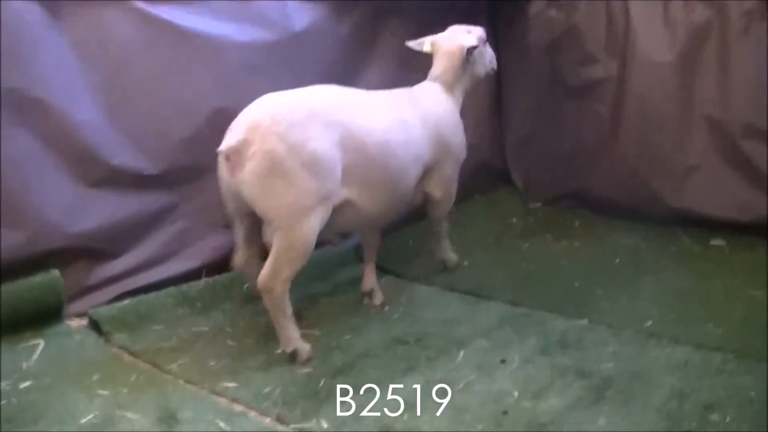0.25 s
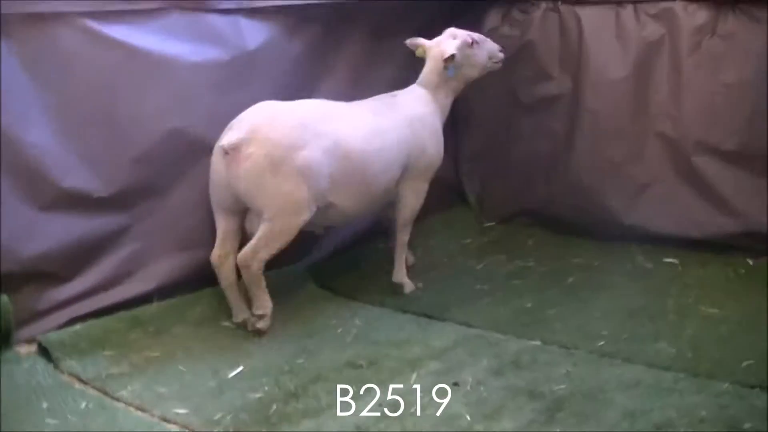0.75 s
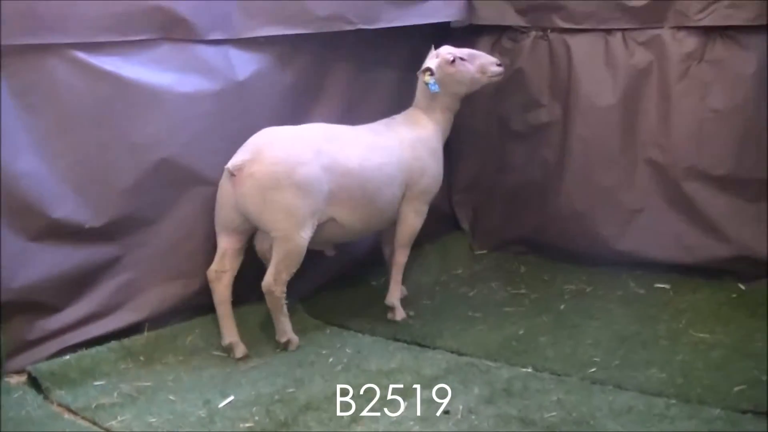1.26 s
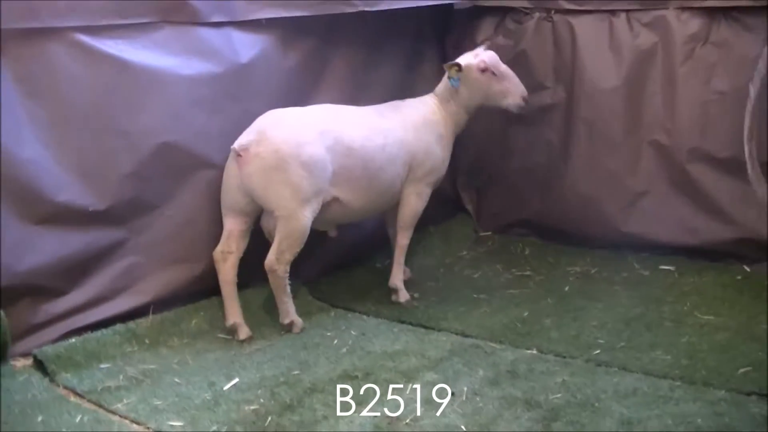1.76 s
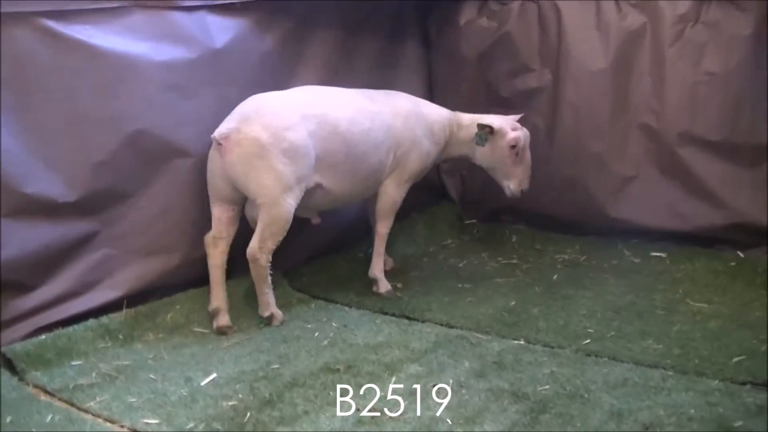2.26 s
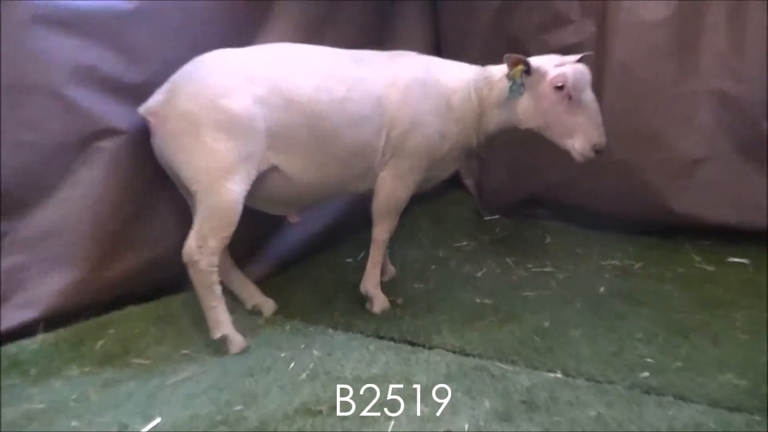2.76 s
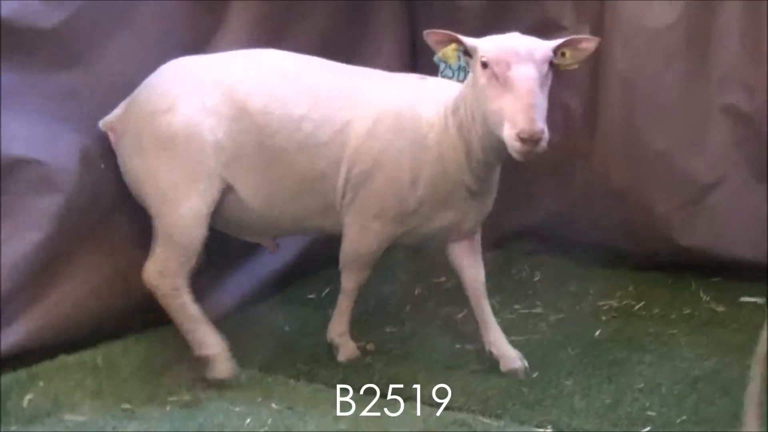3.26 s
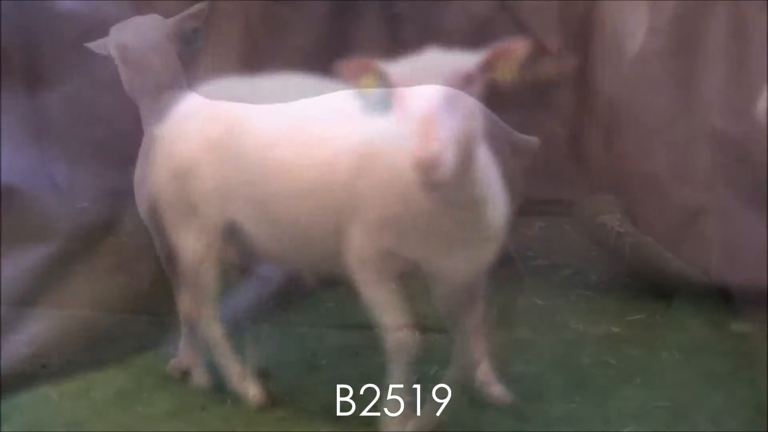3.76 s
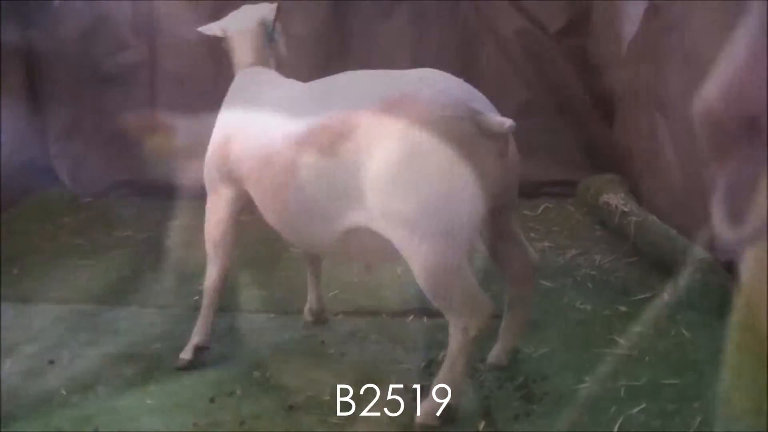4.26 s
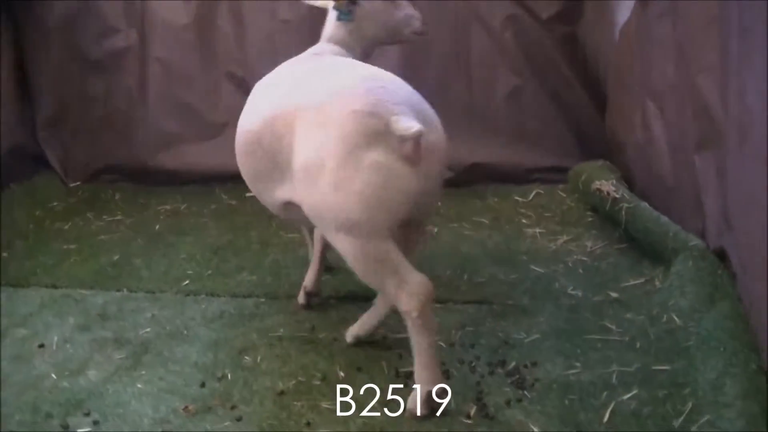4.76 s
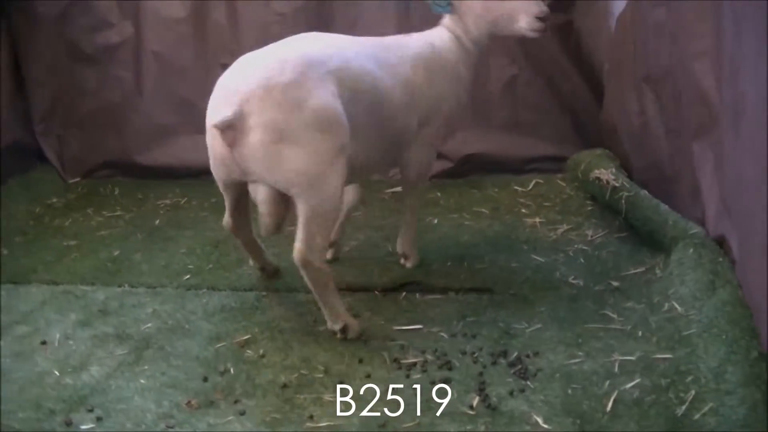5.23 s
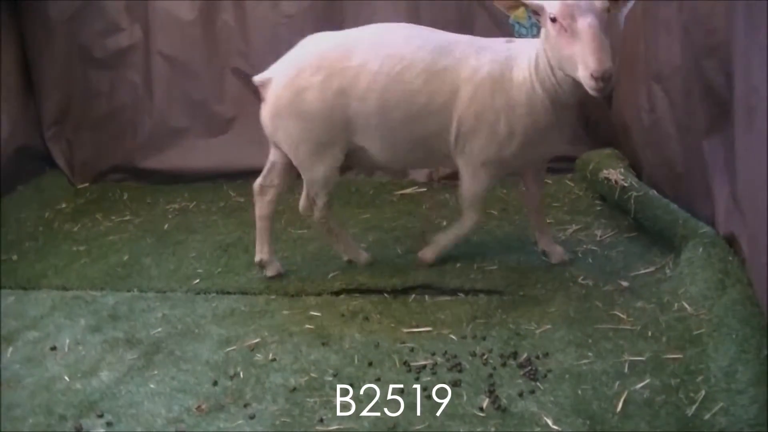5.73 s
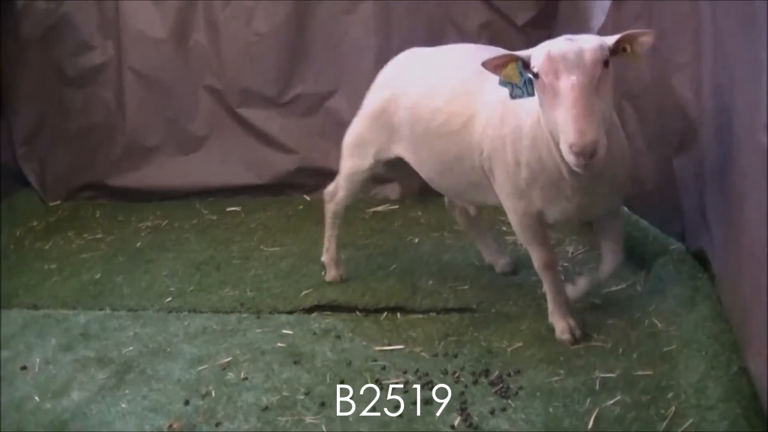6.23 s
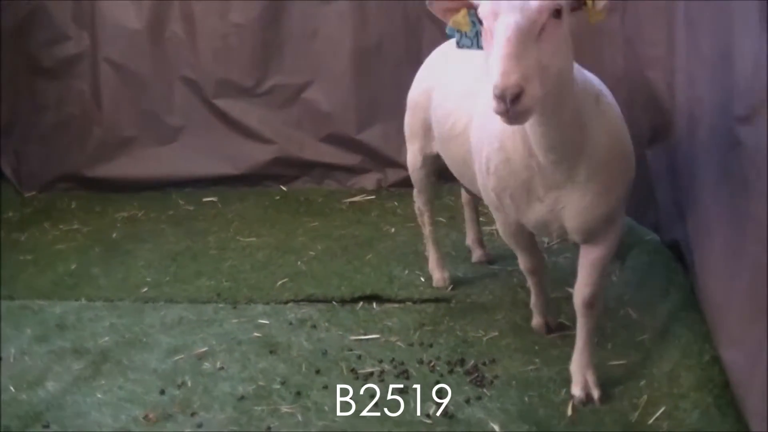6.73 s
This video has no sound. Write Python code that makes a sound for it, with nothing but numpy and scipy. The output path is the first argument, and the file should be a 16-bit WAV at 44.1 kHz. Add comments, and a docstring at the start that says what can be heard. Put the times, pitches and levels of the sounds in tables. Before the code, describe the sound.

A deep sheep bleat rises from a hum to a loud, strained call close to the microphone, and a younger sheep replies on the right with a shorter, higher one. Small birds sing all the while in the lightly echoing barn, their thin whistles and falling sweeps turning into sharp chirps and twittering in the second half. Hooves thud softly on matting now and then, above a quiet, steady hiss and rumble.

```python
"""Two sheep in a barn

A ram starts a low bleat with closed lips and opens his mouth as it swells; a younger sheep answers
with a high bleat from the right. Each voice is a train of glottal pulses filtered by the throat.
Small birds sing gliding, nearly pure tones under the roof, and the ram's hooves thud softly on the
matting. Faint hoarse calls reverberate far away, over a steady hiss and a low rumble of air."""
import sys
import numpy as np
from scipy import signal
from scipy.fft import rfft, irfft
from scipy.io import wavfile
from scipy.ndimage import uniform_filter1d

SR = 44100
rng = np.random.default_rng(int(sys.argv[2]) if len(sys.argv) > 2 else 0)


def file_out(sig):
    """Save sig as 16-bit WAV at sys.argv[1]."""
    # one column per channel
    cols = np.atleast_2d(sig).T
    # limit, then scale
    lim = np.clip(cols, -1, 1)
    pcm = np.round(lim * 32767).astype(np.int16)
    wavfile.write(sys.argv[1], SR, pcm)


N = 308241
TIME = np.arange(N) / SR
CUTOFF_HZ = 10450

# Reverberation of the barn. Each row: frequency in Hz, time to decay by 60 dB in seconds.
BARN_T60 = [(500, 0.29), (3000, 0.49), (6000, 1), (10000, 0.66)]
# Rumble of air. Each row: time in seconds, level in dB.
RUMBLE_LEVEL = [(0, -50.5), (.6, -50), (4.2, -54), (5.2, -44.5), (6.99, -51.5)]
# Spectra of the rumble (shared by the steps), the hiss and the distant calls.
# Each row: frequency in Hz, relative level in dB.
RUMBLE_SPECTRUM = [(12, -6.5), (35, 2.5), (90, -7.5), (170, -16.5), (400, -32), (2000, -77.5)]
HISS_SPECTRUM = [(200, 0.5), (400, 2), (900, -7), (2000, -6.5), (6000, 0.5), (10400, -7)]
FAR_CALL_SPECTRUM = [(800, -54), (1150, -3.5), (1400, 2.5), (2100, -10.5), (3000, -40.5)]
RUMBLE_CORRELATION = 0.083  # between left and right
# Distant hoarse calls. Each row: start in seconds, length in seconds, top pitch in Hz, level in dB.
FAR_CALL_NOTES = [(4.77, .43, 238.4, -54.5), (5.58, .33, 244.2, -56.5)]
# Hooves on the matting. Each row: start in seconds, peak level in dB.
HOOF_FALLS = [(0.751, -41.5), (4.541, -39.5), (5.095, -38.5), (5.42, -37.5), (6.584, -43.5)]

# Whistles from the far end of the hall.
# Each row: start in seconds, length in seconds, lowest pitch in Hz, top pitch in Hz, level in dB.
FAR_WHISTLE_NOTES = [(0.154, 0.093, 2046, 3460, -43), (0.609, 0.076, 2180, 3485, -41.5),
                     (6.566, 0.15, 2473, 3573, -41), (6.882, 0.089, 2227, 3190, -36.5)]
# Low rounded bird notes. Each row: start in seconds, level in dB.
HOOT_NOTES = [(.03, -45.5), (.488, -45.5)]
# Whistles of the near birds.
# Each row: start in seconds, length in seconds, first pitch in Hz, last pitch in Hz, level in dB.
WHISTLE_NOTES = [(0.206, 0.12, 5900, 5990, -51), (1.029, 0.069, 2995, 2720, -51.5),
                 (1.108, 0.11, 6106, 6290, -46), (1.208, 0.077, 6240, 5320, -48.5),
                 (1.243, 0.052, 4650, 4430, -48.5), (1.323, .019, 5210, 3784, -42.5),
                 (1.397, 0.06, 3430, 2540, -47.5), (1.454, 0.18, 7386, 7320, -47),
                 (1.522, 0.11, 3240, 2750, -50.5), (1.721, 0.032, 3340, 3200, -43.5),
                 (1.725, 0.07, 5114, 4790, -45.5), (1.8, 0.025, 4660, 3420, -47.5),
                 (1.914, .079, 5150, 4906, -44), (2.11, 0.06, 4998, 4940, -41.5),
                 (2.265, 0.09, 7860, 7760, -46), (4.063, .15, 7940, 7450, -51.5),
                 (4.823, .21, 3073, 3210, -50), (5.163, .13, 3210, 2916, -53.5),
                 (5.3, 0.16, 2610, 2286, -57.5), (5.738, 0.053, 2410, 2640, -50),
                 (6.224, 0.077, 2456, 2700, -51.5)]
# Spells of twittering.
# Each row: start in seconds, end in seconds, lowest and highest mid-note pitch in Hz, level in dB.
TWITTER_SPELLS = [(4.011, 4.428, 3700, 5626, -53), (4.647, 4.849, 2705, 3500, -54),
                  (5.8, 6.2, 2200, 3900, -52.5), (5.38, 5.46, 2600, 4400, -57.5)]
# Chirps of a bird in the roof.
# Each row: start in seconds, length in seconds, top pitch in Hz, end pitch in Hz, level in dB.
CHIRP_NOTES = [(2.407, 0.072, 6770, 5250, -40.5), (4.101, 0.018, 3810, 3850, -39.5),
               (4.232, 0.035, 4460, 4280, -31.5), (4.278, 0.019, 4110, 4050, -34),
               (4.406, 0.053, 6090, 4660, -39), (4.359, 0.028, 5480, 5160, -39.5),
               (4.556, 0.04, 7420, 4680, -43), (4.631, 0.054, 4325, 2840, -37),
               (4.701, 0.03, 2980, 2470, -42.5), (4.828, 0.035, 7150, 5810, -47),
               (5.11, 0.055, 6130, 4300, -38), (5.147, 0.12, 8310, 6610, -35.5),
               (5.327, .125, 6760, 5630, -33), (5.563, 0.093, 6835, 4100, -33.5),
               (5.737, 0.023, 4365, 4500, -31), (5.762, 0.047, 3968, 3725, -29.5),
               (5.896, 0.037, 3818, 2940, -32.5), (6.056, 0.038, 4145, 3360, -30.5)]

# The lamb's effort, an arch ending in three pushes. Each row: time in seconds, pitch in Hz, level in dB.
LAMB_CONTOUR = [(2.57, 358, -39.5), (2.626, 388.5, -34.5), (2.67, 377, -33), (2.725, 420, -35.5),
                (2.775, 422.5, -33), (2.86, 429.2, -31), (3.0, 395.5, -34), (3.122, 393.3, -37.5),
                (3.143, 391.8, -32), (3.172, 386.6, -38.5), (3.196, 380, -34), (3.262, 356, -40.5)]
# Resonances of the lamb's throat. Each row: frequency in Hz, relative gain in dB.
LAMB_FORMANTS = [(400, -21), (600, -14.5), (830, -2), (1230, 0), (1720, -21.5), (2200, -20.5), (2600, -8.5),
                 (3150, -27), (4000, -11.5), (8500, -33), (10000, -28)]
# The walls reflect more of the lamb's treble than of its bass. Each row: frequency in Hz, gain in dB.
WALL_REFLECTION = [(1300, 8), (2400, 15)]

# The ram's effort, heard as pitch. Each row: time in seconds, pitch in Hz.
RAM_CONTOUR = [(1.12, 89.5), (1.33, 99.2), (1.58, 105.1), (1.626, 100.1), (1.846, 117.9), (2.014, 125),
               (2.2, 126.8), (2.345, 129.8), (2.385, 121.7), (2.43, 105)]
# His mouth. Each row: time in seconds, opening (0 shut, 1 parted, 2 wide, 3 strained), roughness 0 to 1.
RAM_MOUTH = [(1.54, 0, 0.25), (1.64, 1.3, .4), (1.96, 1.12, 0.19), (2.03, 2.5, 0.09), (2.23, 2.5, 0.12),
             (2.32, 2.5, 0.24), (2.39, 2.5, 0.87)]
# Resonances of his throat at the four openings. Each row: frequency in Hz, relative gain in dB.
SHUT_FORMANTS = [(100, -0.5), (410, -0.5), (640, -6), (980, -5.5), (1700, -24.5), (2200, -17.5),
                 (4000, -35), (9000, -53)]
PARTED_FORMANTS = [(110, -8.5), (460, 1.5), (720, -7.5), (1250, -17), (2800, -8), (3400, -23.5),
                   (4300, -25), (9000, -20)]
WIDE_FORMANTS = [(255, -20), (380, 2.5), (505, -11.5), (750, -2.5), (1260, -11.5), (1400, -15),
                 (2030, -10.5), (2350, -23), (3000, -15.5), (3500, -26.5), (9000, -35)]
STRAINED_FORMANTS = [(125, -15), (385, 3.5), (640, -14), (770, -9.5), (920, -18), (1170, 5), (1390, -14),
                     (1540, -0.5), (1680, -18.5), (3250, -26), (9000, -35)]
# A strong resonance that sinks as his jaw drops. Each row: time in seconds, centre in Hz, boost in dB.
JAW_FORMANT = [(1.6, 2252, 9.5), (1.92, 2073, 19.5), (2.05, 1926, 12.5), (2.3, 2015, 7)]


def from_db(db):
    """Amplitude grows tenfold with every 20 dB."""
    return 10 ** (np.asarray(db) / 20)


def rms_one(x):
    """Normalisation to unit mean power."""
    return x / np.sqrt(np.mean(x ** 2) + 1e-20)


def in_time(rows):
    """Linear interpolation of each column at every sample."""
    seconds, *columns = np.transpose(rows)
    return [np.interp(TIME, seconds, column) for column in columns]


def at_hz(points, hz):
    """Interpolation on a logarithmic frequency axis."""
    frequency, value = np.transpose(points)
    return np.interp(np.log(np.maximum(hz, 1)), np.log(frequency), value)


def drift(rate):
    """Band-limited fluctuation of unit rms, joining `rate` random values a second."""
    knots = rng.standard_normal(N // 8)
    return rms_one(np.interp(TIME * rate, np.arange(len(knots)), knots))


def gate(t, start, end, attack, release):
    """An envelope with raised-cosine edges; times in seconds."""
    ramp = np.clip(np.minimum((t - start) / attack, (end - t) / release), 0, 1)
    return np.sin(np.pi / 2 * ramp) ** 2


def add(out, start, sound):
    """Superposition of a sound from its start in seconds."""
    place = out[max(int(start * SR), 0):][:len(sound)]
    place += sound[:len(place)]


def colour(x, spectrum, size=8192):
    """Minimum-phase filtering: folding the cepstrum makes the response causal."""
    cepstrum = irfft(np.log(from_db(at_hz(spectrum, np.fft.rfftfreq(size, 1 / SR)))))
    cepstrum[1:size // 2] *= 2
    cepstrum[size // 2 + 1:] = 0
    response = irfft(np.exp(rfft(cepstrum)))
    return signal.oaconvolve(np.atleast_2d(x), response[None], axes=1)[:, :N]


def pan(x, left_db):
    """A level difference between the two sides gives a source its direction."""
    sides = from_db(np.array([[left_db], [-left_db]]) / 2)
    return x * rms_one(sides)


def stereo_noise(spectrum, correlation):
    """Partly coherent noise: one part is in phase on both sides, the other in antiphase."""
    mid, side = rng.standard_normal((2, N))
    white = np.sqrt(1 + correlation) * mid + np.sqrt(1 - correlation) * side * [[1], [-1]]
    return rms_one(colour(white, spectrum))


def barn(x, early_db, tail_db, early_t60=0.23):
    """Reverberation: sparse early reflections off the pen, then the hall's diffuse decaying tail."""
    t = TIME[:SR]
    white, tail = rng.standard_normal((2, SR)), 0
    edges_hz = np.geomspace(80, 12000, 8)
    for low, high in zip(edges_hz, edges_hz[1:]):
        band = signal.sosfilt(signal.butter(2, [low, high], "band", fs=SR, output="sos"), white)
        tail = tail + band * from_db(-60 * t / at_hz(BARN_T60, np.sqrt(low * high)))
    tail = tail * gate(t, 0.022, 0.75, attack=0.082, release=.5)
    reflections = rng.standard_normal((2, SR)) * (rng.random((2, SR)) < .05)
    early = reflections * from_db(-60 * t / early_t60) * (t > .002)
    response = (from_db(early_db) * rms_one(early) + from_db(tail_db) * rms_one(tail) / 2) / np.sqrt(SR)
    return signal.fftconvolve(np.atleast_2d(x), response, axes=1)[:, :N]


def background():
    """Broadband noise: a slowly varying rumble of air under a steady hiss."""
    rumble_db, = in_time(RUMBLE_LEVEL)
    rumble = from_db(rumble_db) * stereo_noise(RUMBLE_SPECTRUM, RUMBLE_CORRELATION)
    return rumble + from_db(-54) * stereo_noise(HISS_SPECTRUM, correlation=0.65)


def larynx(pitch, rough, jitter, shimmer_db, air):
    """Glottal source: a pulse and a puff of air each cycle; roughness scales jitter, shimmer and air."""
    pitch = pitch * (1 + jitter * rough * drift(140))
    phase = 2 * np.pi * np.cumsum(pitch) / SR
    harmonics = int(CUTOFF_HZ * 1.2 / np.median(pitch))
    # closed form of a sum of equally strong harmonics
    pulses = rms_one(np.sin((harmonics + .5) * phase) / (np.sin(phase / 2) + 1e-12) - 1)
    puffs = rms_one(rng.standard_normal(N) * (3.4 + np.cos(phase)))
    return pulses * from_db(shimmer_db * rough * drift(220)) + air * rough * puffs


def far_calls(sag=0.084):
    """Each distant call, a hoarse arch of pitch, arrives as reverberant sound alone."""
    pitch, envelope = np.full(N, FAR_CALL_NOTES[0][2]), 0
    for start, length, top_hz, level_db in FAR_CALL_NOTES:
        position = 2 * (TIME - start) / length - 1
        pitch = np.where(np.abs(position) < 1, top_hz * (1 - sag * position ** 2), pitch)
        envelope = envelope + from_db(level_db) * gate(TIME, start, start + length, 0.034, 0.066)
    source = larynx(pitch, rough=.3, jitter=.03, shimmer_db=6, air=.8)
    return barn(envelope * rms_one(colour(source, FAR_CALL_SPECTRUM)), early_db=-3.5, tail_db=5.5)


def steps(swell_s=0.029):
    """Cushioned impact: each hoof on the matting gives low noise that swells and dies away."""
    envelope, t = np.zeros(N), TIME[:SR] / swell_s
    for start, level_db in HOOF_FALLS:
        add(envelope, start, from_db(level_db) * t * np.exp(1 - t))
    return envelope * stereo_noise(RUMBLE_SPECTRUM, RUMBLE_CORRELATION)


def slide(length, from_hz, to_hz, ease=1.6):
    """A power-law glide: the pitch moves quickly at first and then settles."""
    return to_hz + (from_hz - to_hz) * np.linspace(1, 0, int(length * SR)) ** ease


def arch(length, top_hz, end_hz, rise_s, scoop, bend):
    """A glide up from the fraction `scoop` below the top, then down; more bend delays the fall."""
    t = TIME[:int(length * SR)]
    rising = np.maximum(1 - t / rise_s, 0)
    falling = np.maximum(t - rise_s, 0) / max(length - rise_s, 1e-3)
    return top_hz * (1 - scoop * rising ** 2) + (end_hz - top_hz) * falling ** bend


def syrinx(pitch, level_db, waver, swell_db, edge_s=0.0031):
    """A bird's tone: a sine with random frequency modulation, its middle `swell_db` above its ends."""
    t, position = TIME[:len(pitch)], np.linspace(-1, 1, len(pitch))
    tremble = np.interp(t * 500, np.arange(300), rng.standard_normal(300))
    tone = np.sqrt(2) * np.sin(2 * np.pi * np.cumsum(pitch * (1 + waver * tremble)) / SR)
    return tone * from_db(level_db + swell_db * (.5 - position ** 2)) * gate(t, 0, t[-1], edge_s, edge_s)


def far_whistler(dip_s=.012, rise_s=0.036):
    """Whistles dip, rise and level off; at this distance reverberation outweighs the direct sound."""
    song = np.zeros(N)
    for start, length, low_hz, top_hz, level_db in FAR_WHISTLE_NOTES:
        dip = np.exp(-((TIME[:int(length * SR)] - dip_s) / rise_s) ** 2)
        add(song, start, syrinx(top_hz + (low_hz - top_hz) * dip, level_db, waver=0.01, swell_db=4.5))
    return pan(from_db(-4) * song + barn(song, early_db=-1, tail_db=2.5), left_db=-2.5)


def hoots():
    """Low rounded notes: the direct sound comes from the right, the reverberation from both sides."""
    song = np.zeros(N)
    pitch = arch(length=0.058, top_hz=1894, end_hz=1390, rise_s=0.0305, scoop=0.191, bend=2.06)
    for start, level_db in HOOT_NOTES:
        add(song, start, syrinx(pitch, level_db, waver=0.0084, swell_db=12.5))
    return pan(song, left_db=-11) + barn(song, early_db=-7.5, tail_db=1)


def whistles():
    """Nearly pure tones, held or gliding."""
    song = np.zeros(N)
    for start, length, from_hz, to_hz, level_db in WHISTLE_NOTES:
        add(song, start, syrinx(slide(length, from_hz, to_hz), level_db, waver=0.0061, swell_db=1.5))
    return song


def seesaw(start_s=.347, period_s=.249, drop_after_s=.139, count=3):
    """Two frequency sweeps alternate: a high arch and a quick drop."""
    song = np.zeros(N)
    high = arch(length=.11, top_hz=8370, end_hz=7130, rise_s=0.024, scoop=0.32, bend=1.8)
    drop = slide(length=0.029, from_hz=5750, to_hz=3930)
    for start in start_s + period_s * np.arange(count):
        add(song, start, syrinx(high, level_db=-49, waver=0.01, swell_db=-5.5))
        add(song, start + drop_after_s, syrinx(drop, level_db=-47.5, waver=0.012, swell_db=0))
    return song


def swoops(start_s=3.085, period_s=.159, count=6):
    """A falling sweep repeats periodically and soon reaches full strength."""
    song = np.zeros(N)
    pitch = arch(length=.12, top_hz=7100, end_hz=4270, rise_s=0.027, scoop=0.0978, bend=2.1)
    for k in range(count):
        note = syrinx(pitch * rng.normal(1, 0.00788), level_db=-47 - 3.5 * .5 ** k, waver=.015, swell_db=0)
        add(song, start_s + period_s * k, note)
    return song


def near_birds():
    """Close by, a little to the right, direct sound and early reflections outweigh the tail."""
    song = whistles() + seesaw() + swoops()
    return pan(song + barn(song, early_db=0, tail_db=-14.5), left_db=-1.5)


def twitter(notes_per_s=50, note_s=0.03, glide=0.377, spread_db=18.5):
    """Short exponential sweeps at random pitches, most of them falling."""
    song, position = np.zeros(N), np.linspace(-.5, .5, int(note_s * SR))
    for start, end, low_hz, high_hz, level_db in TWITTER_SPELLS:
        count = max(int((end - start) * notes_per_s), 1)
        for k, (when, height, slope, strength) in enumerate(rng.random((100, 4))[:count]):
            pitch = low_hz * (high_hz / low_hz) ** height * np.exp(glide * (.3 - slope) * position)
            onset = start + (end - start - note_s) * (k + when) / count
            note_db = level_db + spread_db * (strength - .5)
            add(song, onset, syrinx(pitch, note_db, waver=0.031, swell_db=10.5))
    return song


def roof_birds(rasp_per_s=3.3):
    """Loud chirps and twittering; fast amplitude modulation makes the longer chirps rasp."""
    song = np.zeros(N)
    for start, length, top_hz, end_hz, level_db in CHIRP_NOTES:
        pitch = arch(length, top_hz, end_hz, rise_s=0.0141, scoop=0.1274, bend=1.2)
        flutter = rms_one(1 + rasp_per_s * length * drift(2200)[:len(pitch)])
        add(song, start, flutter * syrinx(pitch, level_db, waver=0.015, swell_db=-2))
    song = song + twitter()
    direct = np.stack([np.roll(song, 2), song])  # reaches the left two samples later
    return pan(direct, left_db=0.5) + barn(song, early_db=-3, tail_db=-4)


def evened(voice):
    """Division by the running rms holds the level at one whatever the pitch and vowel."""
    return voice / np.sqrt(uniform_filter1d(voice ** 2, size=1200) + 1e-6)


def smear(x, shortest_s, longest_s):
    """All-pass dispersion: short repeated echoes spread each pulse and leave the colour alone."""
    for lag in (np.geomspace(shortest_s, longest_s, 4) * SR).astype(int):
        taps = np.r_[1, np.zeros(lag), -.5]
        x = signal.lfilter(taps[::-1], taps, x)
    return x


def lamb(start_s=2.54, end_s=3.28, quaver_hz=17.5):
    """Source and filter: a high bleat, hoarser and more deeply modulated as its pitch sags."""
    pitch, level_db = in_time(LAMB_CONTOUR)
    octaves_below_top = np.log2(pitch.max() / pitch)
    rough = 0.214 + 2 * octaves_below_top
    quaver = rough * np.sin(2 * np.pi * quaver_hz * (TIME - start_s))
    source = larynx(pitch * (1 + 0.014 * quaver), rough, jitter=.025, shimmer_db=4.5, air=0.3)
    voice = evened(rms_one(colour(source, LAMB_FORMANTS)))
    voice = voice * from_db(level_db + 3 * quaver)
    voice = voice * gate(TIME, start_s, end_s, attack=0.032, release=0.058)
    # the boards close beside it add their echoes before the sound reaches the pen
    voice = smear(voice, shortest_s=.0003, longest_s=.0013)
    voice = voice + barn(voice, early_db=-13, tail_db=-34, early_t60=.04)[:1]
    echoes = barn(colour(voice, WALL_REFLECTION), early_db=-16, tail_db=-32, early_t60=.08)
    return pan(voice, left_db=-15) + echoes


def moving_resonance(x, hz, width_hz, block=128):
    """A two-pole resonator of unit peak gain whose centre follows a curve."""
    radius = np.exp(-np.pi * width_hz / SR)
    out, state = np.zeros(N), np.zeros(2)
    for i in range(0, N, block):
        poles = [1, -2 * radius * np.cos(2 * np.pi * hz[i] / SR), radius ** 2]
        out[i:i + block], state = signal.lfilter([1, 0, -1], poles, x[i:i + block], zi=state)
    return out * (1 - radius ** 2) / 2


def ram(start_s=0.94, end_s=2.494, db_per_octave=19.5, db_per_opening=4.5):
    """Source and filter: the formants pass from a hum to a tight open vowel as the bleat swells."""
    pitch, = in_time(RAM_CONTOUR)
    opening, rough = in_time(RAM_MOUTH)
    jaw_hz, boost_db = in_time(JAW_FORMANT)
    level_db = -49.5 + db_per_octave * np.log2(pitch / pitch.min()) + db_per_opening * opening
    source = larynx(pitch, rough, jitter=0.042, shimmer_db=6, air=0.4)
    source = signal.sosfilt(signal.butter(2, [70, 6000], "band", fs=SR, output="sos"), source)
    source = smear(source, shortest_s=.0011, longest_s=.0061)
    # the opening crossfades between neighbouring throat shapes
    throats = (SHUT_FORMANTS, PARTED_FORMANTS, WIDE_FORMANTS, STRAINED_FORMANTS)
    shares = [np.interp(opening, range(len(throats)), row) for row in np.eye(len(throats))]
    voice = sum(share * rms_one(colour(source, throat)) for share, throat in zip(shares, throats))[0]
    voice = voice + (from_db(boost_db) - 1) * moving_resonance(voice, jaw_hz, width_hz=69)
    # interference: the wall reflection shifts as his head moves, so single overtones swell and fade
    delay_s = .0053 * (1 + .05 * drift(7))
    voice = voice + from_db(-9) * np.interp(TIME - delay_s, TIME, voice)
    voice = evened(voice) * from_db(level_db) * gate(TIME, start_s, end_s, attack=0.44, release=0.14)
    return pan(voice, left_db=5.5) + barn(voice, early_db=-7, tail_db=-19)


def scene():
    """The pressures of the sheep, the background and the birds add by superposition."""
    sheep = ram() + lamb() + steps()
    return sheep + background() + far_calls() + near_birds() + hoots() + far_whistler() + roof_birds()


def record(dry, offset=.009):
    """An elliptic low-pass cuts the top steeply, and a small steady offset is added."""
    return signal.sosfilt(signal.ellip(12, .1, 80, CUTOFF_HZ, fs=SR, output="sos"), dry) + offset


dry = scene()
out = record(dry)
file_out(out)
```